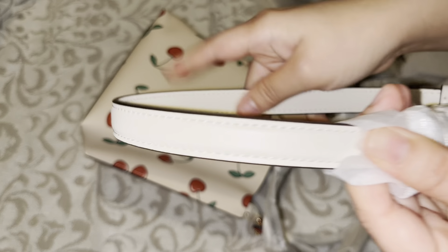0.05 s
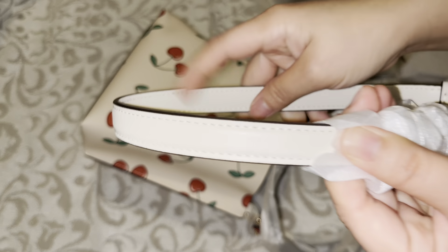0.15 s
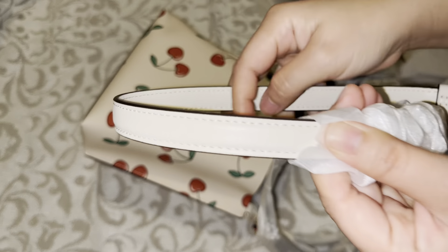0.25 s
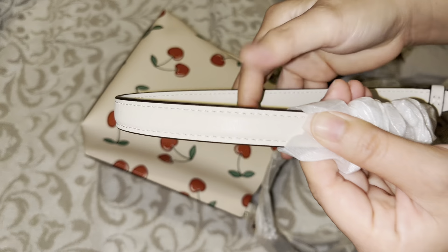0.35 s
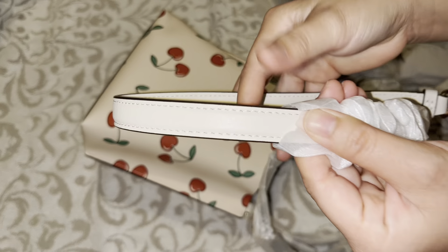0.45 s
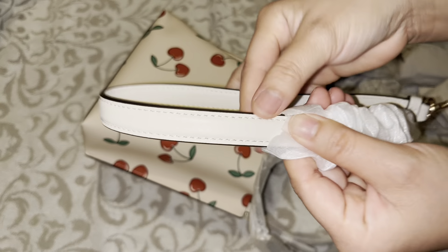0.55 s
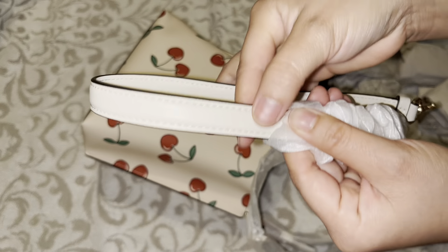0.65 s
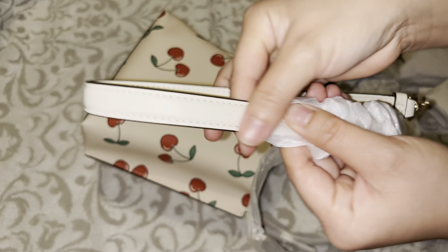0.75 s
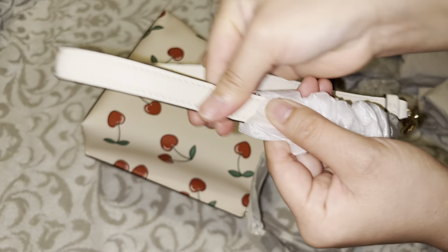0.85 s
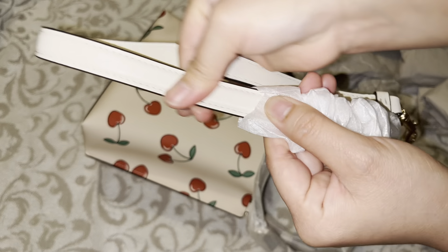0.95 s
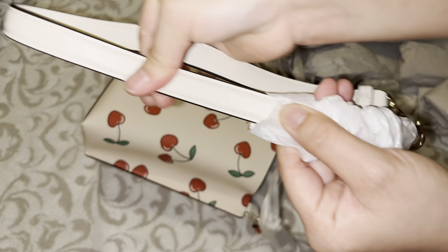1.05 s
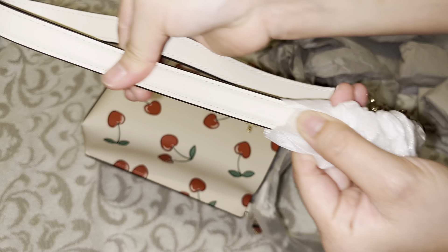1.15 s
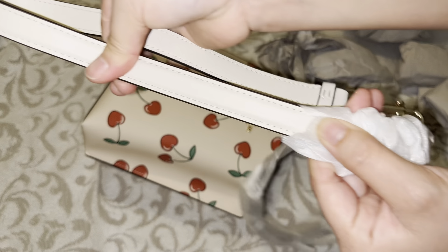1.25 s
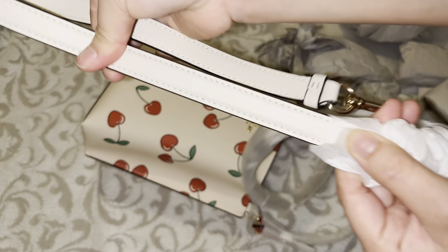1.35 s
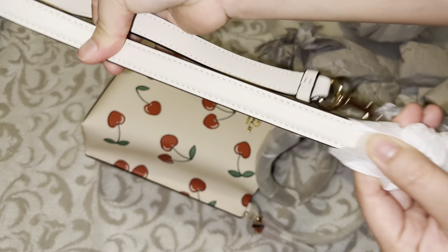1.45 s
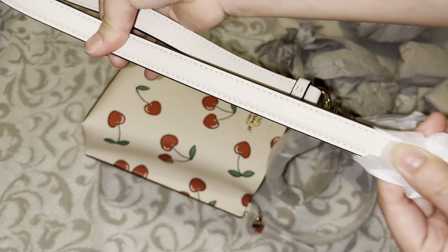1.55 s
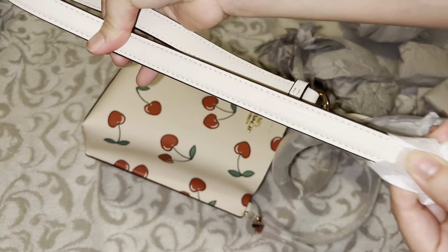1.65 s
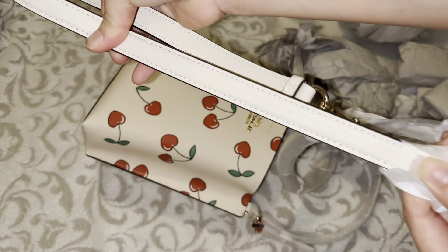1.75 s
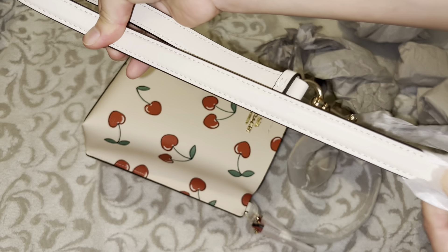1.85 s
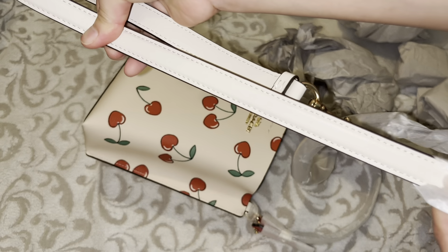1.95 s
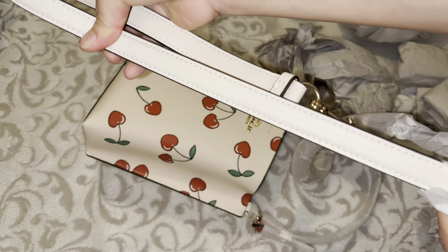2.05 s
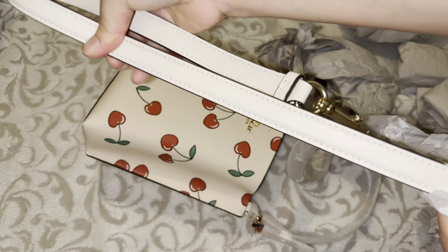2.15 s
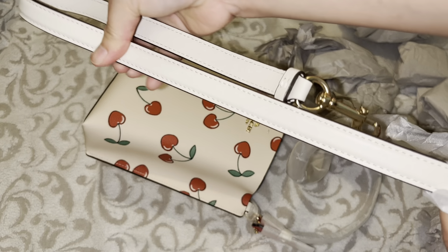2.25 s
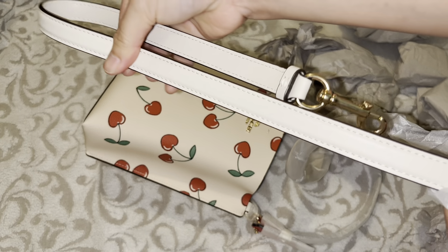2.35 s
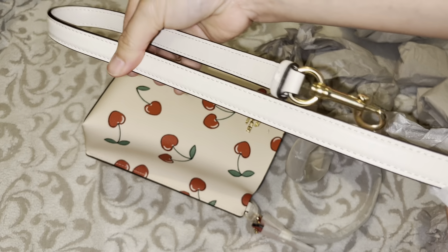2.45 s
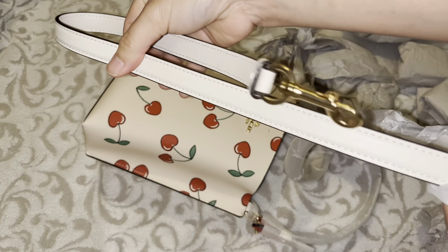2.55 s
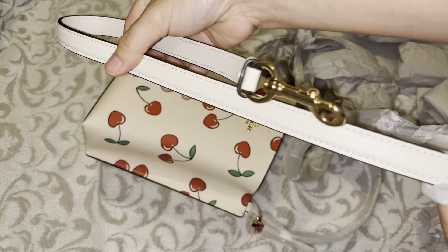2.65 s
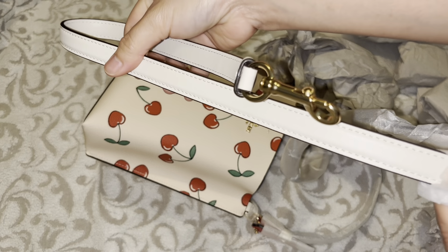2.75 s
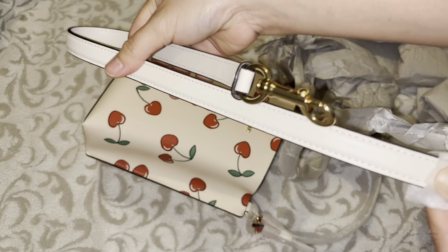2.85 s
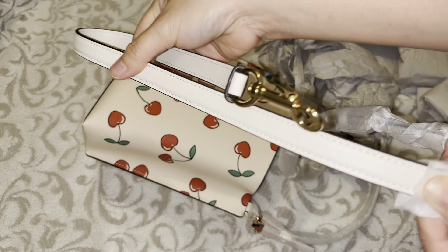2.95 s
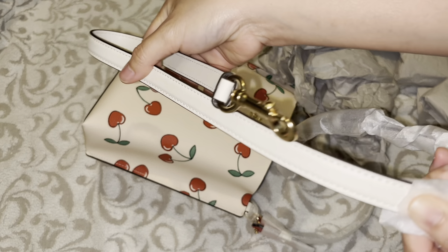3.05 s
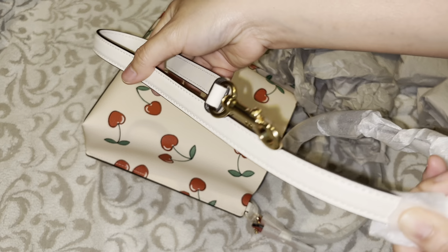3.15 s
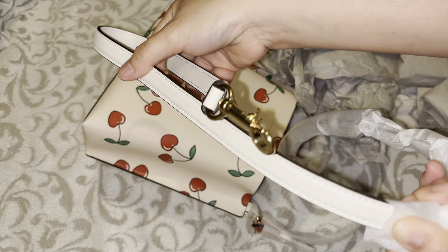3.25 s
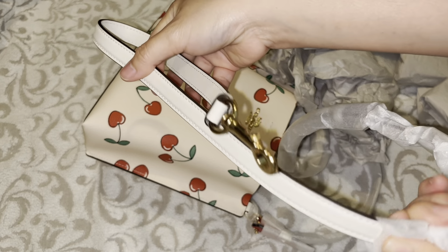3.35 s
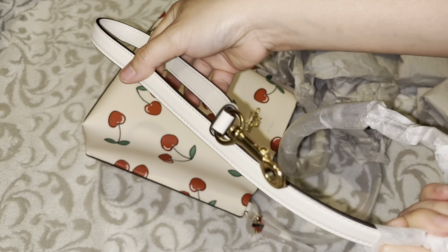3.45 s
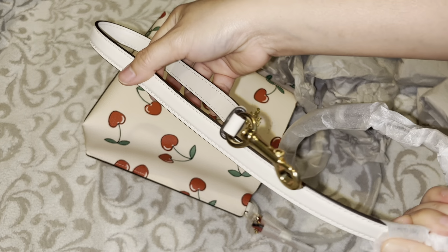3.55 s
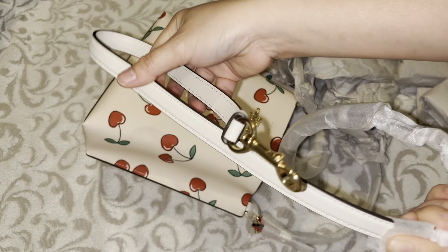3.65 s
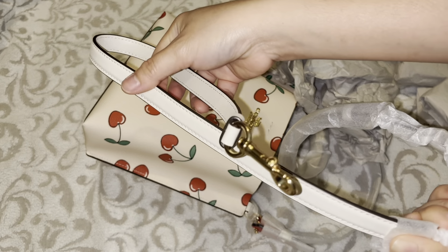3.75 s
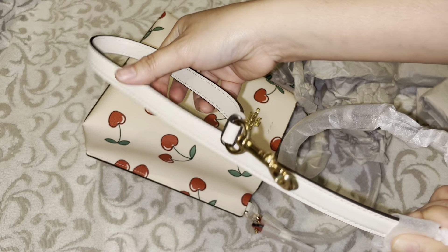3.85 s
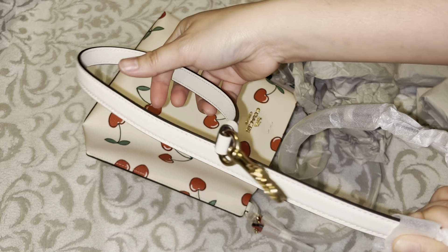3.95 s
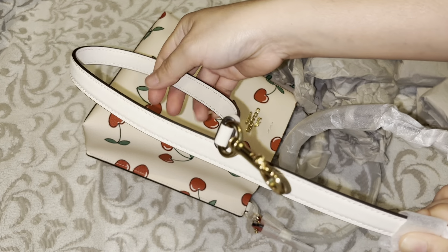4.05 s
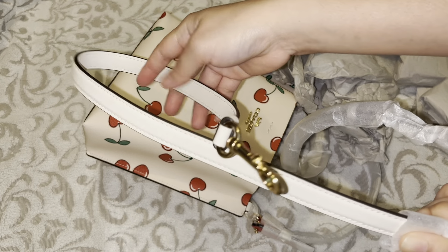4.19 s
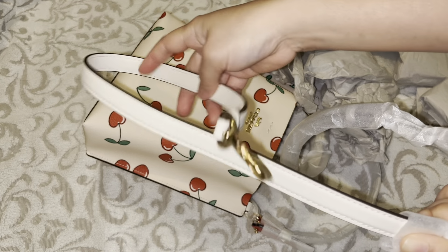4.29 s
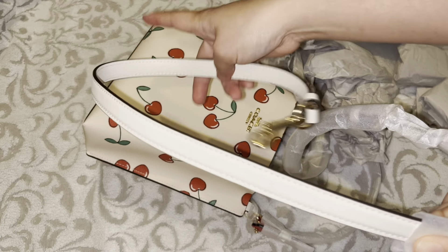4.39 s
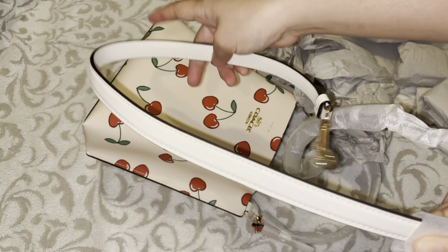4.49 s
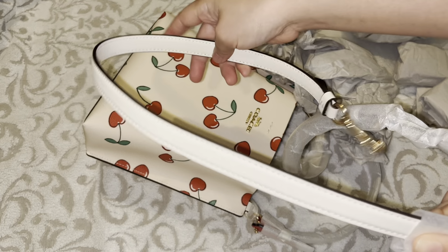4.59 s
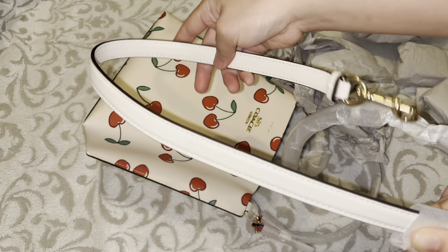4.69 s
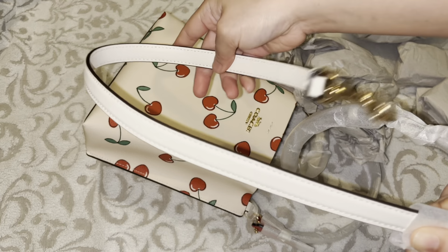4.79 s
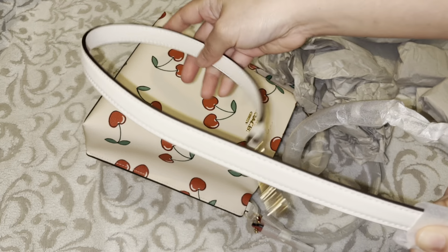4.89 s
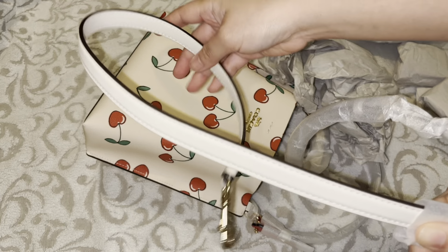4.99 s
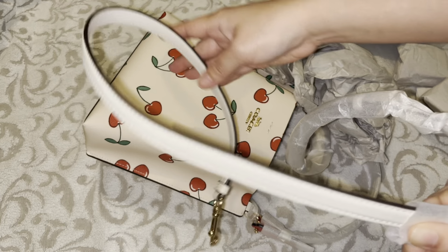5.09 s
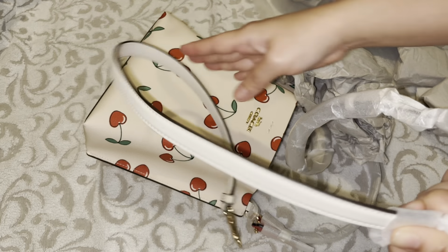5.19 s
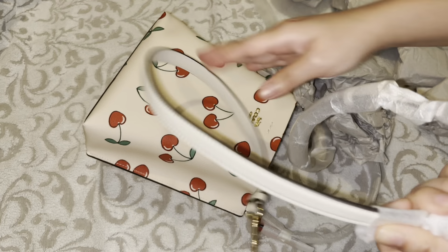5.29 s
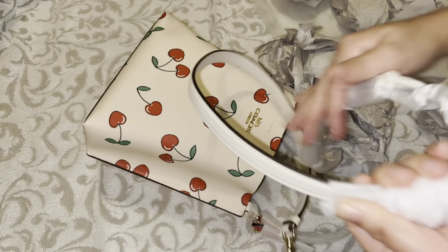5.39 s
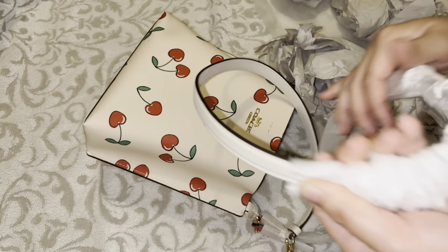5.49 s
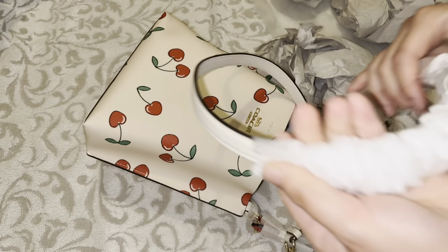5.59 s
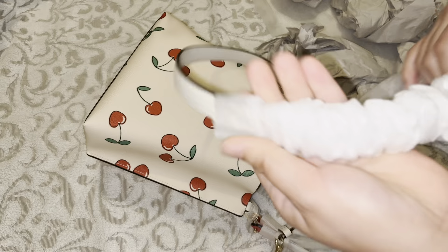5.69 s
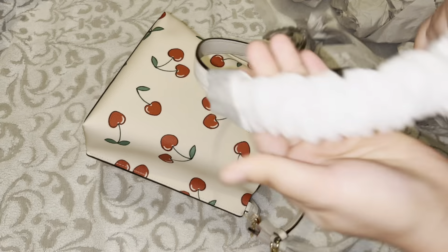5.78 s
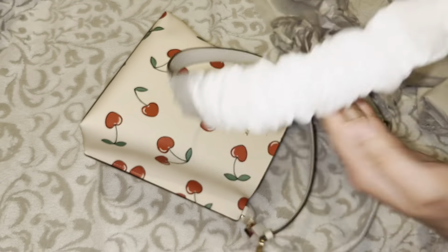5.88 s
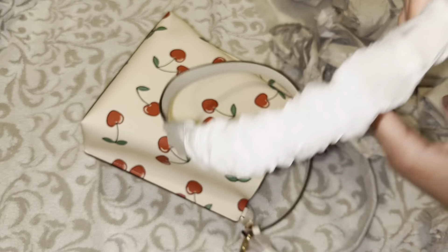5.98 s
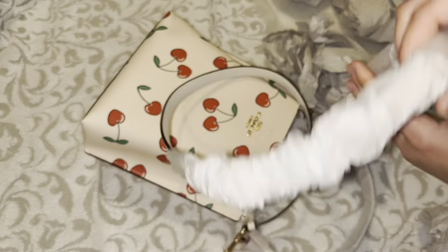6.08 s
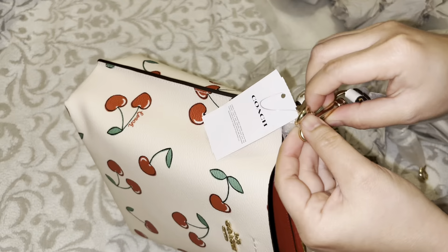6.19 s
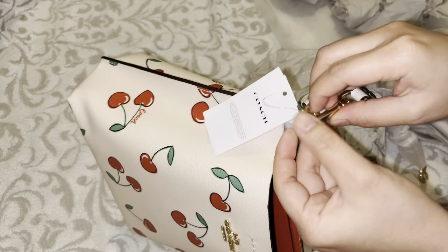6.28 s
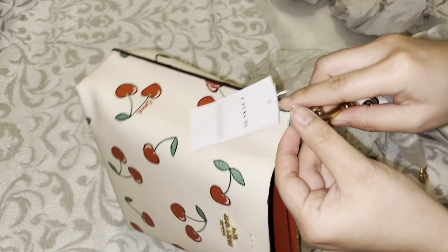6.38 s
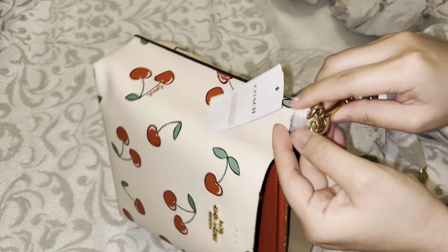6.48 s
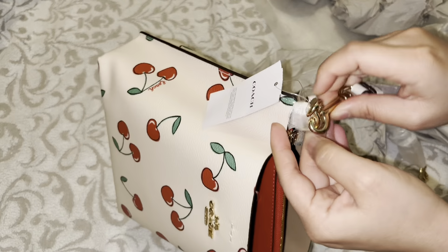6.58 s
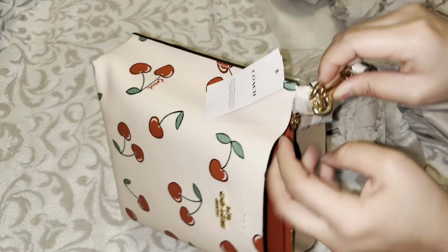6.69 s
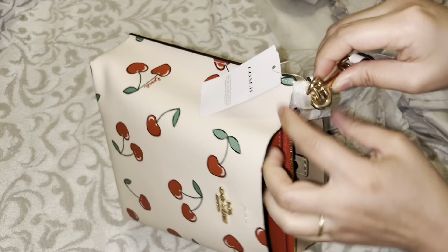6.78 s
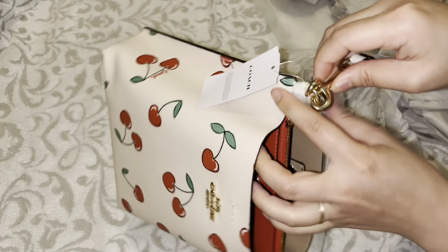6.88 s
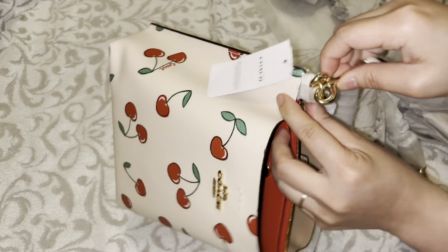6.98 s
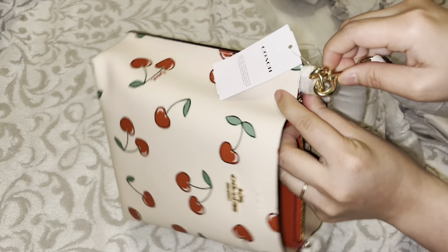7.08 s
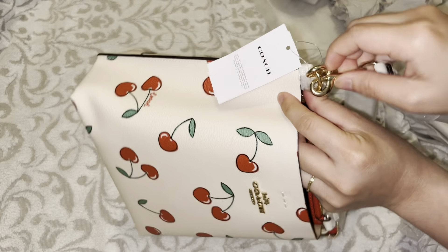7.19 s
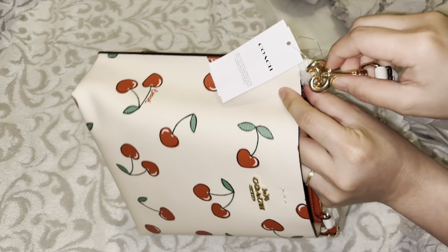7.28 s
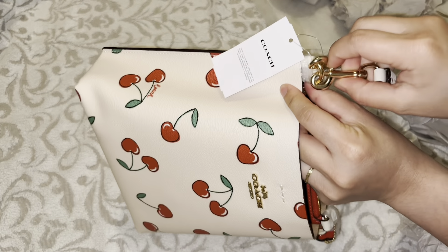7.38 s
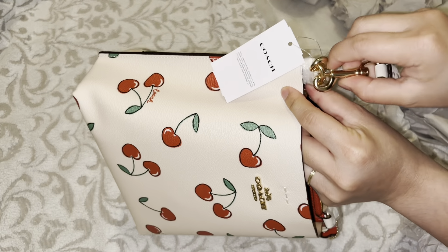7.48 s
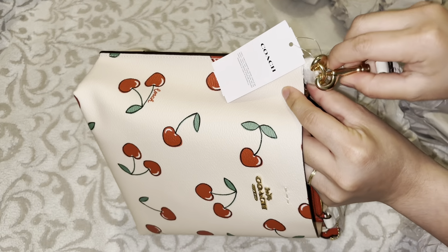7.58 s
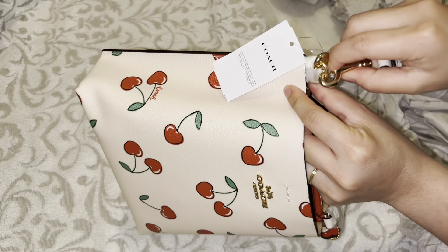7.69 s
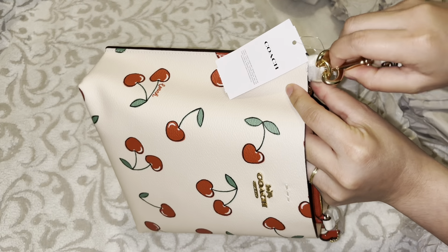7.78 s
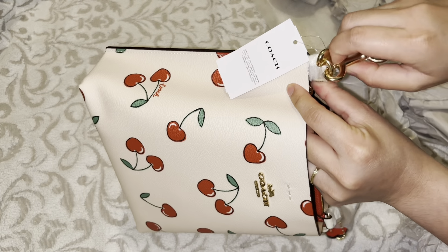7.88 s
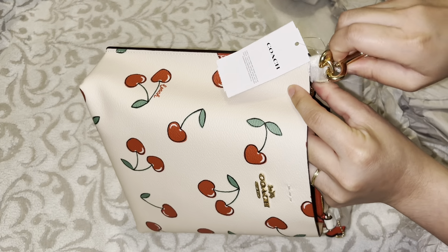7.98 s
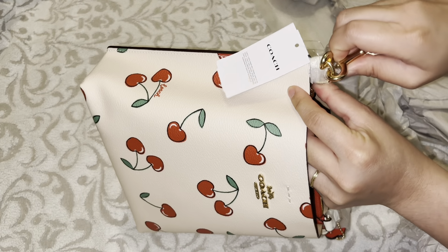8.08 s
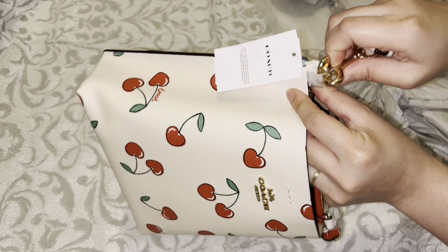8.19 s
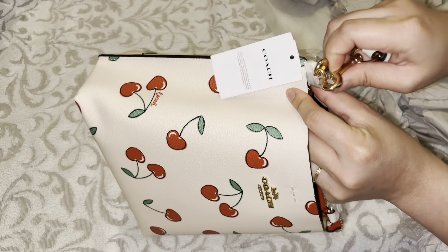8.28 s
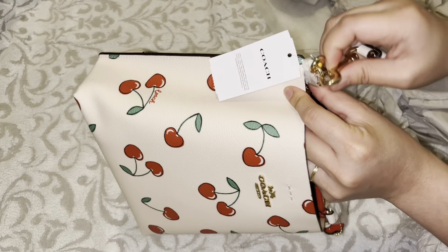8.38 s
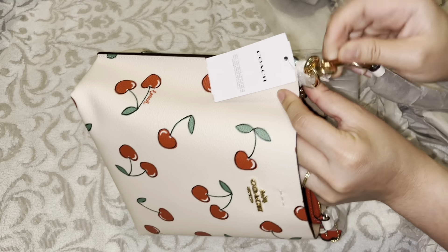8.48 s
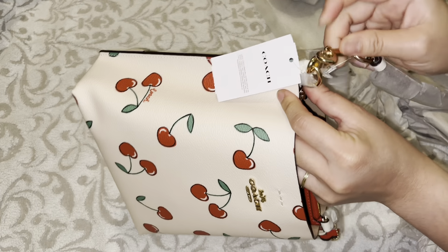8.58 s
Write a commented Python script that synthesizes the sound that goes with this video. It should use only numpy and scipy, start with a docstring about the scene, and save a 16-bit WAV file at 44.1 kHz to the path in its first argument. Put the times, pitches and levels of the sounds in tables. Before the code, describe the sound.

Close handling in a quiet room: papery sliding hiss, near silence with tiny ticks, then a sudden thud, metallic clicks, rustling and soft bag knocks.

```python
"""Close up in a quiet bedroom, a leather strap creaks in tiny stick-slip ticks while a faint tone swells and fades.
A tissue-paper sleeve is pulled along the strap: grainy noise hisses and a band of noise rings higher with effort.
The strap's metal clasp ticks, as short noise bursts through resonances, and then drops on a small handbag.
The paper crinkles in many small buckles as it is put aside; hands knock and rub the hollow bag, with thuds that
fall in pitch and murmuring, booming noise. The low rumble of the house, made of filtered noise, lies under it all."""
import sys
import numpy as np
from scipy import signal
from scipy.fft import rfft, irfft
from scipy.io import wavfile

SR = 44100
rng = np.random.default_rng(int(sys.argv[2]) if len(sys.argv) > 2 else 0)


def transcribe(u):
    """Save the signal u as a 16-bit wav file named by the first command-line argument.

    u: samples, shape (n,) or (channels, n), limited to [-1, 1]; the rate is SR.
    q: integer samples, one column per channel.
    """
    v = np.clip(np.atleast_2d(u).T, -1, 1)
    q = np.round(v * 32767).astype(np.int16)
    wavfile.write(sys.argv[1], SR, q)


N = 381024
TIME = np.arange(N) / SR
CUTOFF_HZ = 15900   # top of the sound
LEFT_RIGHT = np.array([[1], [-1]])   # opposite signs for the two channels


# soft blows on the bag's panels: (time [s], level [dB], base pitch [Hz])
PANEL_BLOWS = [(0.783, -59.5, 286), (1.116, -55.5, 260), (1.167, -51, 272), (1.378, -55, 420),
               (1.398, -49.5, 240), (1.555, -54.5, 169.3), (3.925, -55, 940), (5.187, -16, 260),
               (5.323, -35.5, 286), (5.716, -41, 243), (6.073, -28, 222), (6.072, -33.5, 404),
               (6.302, -36.5, 182), (6.341, -26.5, 234), (6.351, -33.5, 72), (6.476, -33.5, 185),
               (6.637, -40, 680), (6.635, -30, 250), (6.736, -35.5, 197), (6.99, -36.5, 1000),
               (7.002, -34, 300), (7.656, -35, 199), (8.435, -38, 230)]
# resonances of the hollow bag: (pitch [Hz], width [Hz], level [dB])
BAG_RESONANCES = [(410, 26, -3.5), (1000, 190, 3)]
SWELL_CYCLES = 1.37   # a thud's swell peaks after this many cycles of its base pitch
GLIDE_CYCLES = 0.83   # the extra pitch shrinks to about a third in this many cycles


def knocks(glide=2.175, scuff_db=-25.0):
    """Bending waves cross the panel, the short ones first, so each thud falls in pitch; the hollow bag rings on."""
    waves, push = np.zeros(N), np.zeros(N)
    t = np.arange(SR // 4) / SR
    for start_s, level_db, base_hz in PANEL_BLOWS:
        swell_s = SWELL_CYCLES / base_hz
        # the pitch starts far above its base and settles at 0.7 of it
        pitch_hz = base_hz * (0.7 + glide * np.exp(-t * base_hz / GLIDE_CYCLES))
        phase = 2 * np.pi * np.cumsum(pitch_hz) / SR
        swell = from_db(level_db) * (t / swell_s * np.exp(1 - t / swell_s)) ** 2
        add(waves, start_s, swell * np.sin(phase))
        add(push, start_s, swell)
    # the surfaces scuff while they are pressed together
    scuff = push * rms_one(resonance(rng.standard_normal(N), 310, 400))
    blows = waves + from_db(scuff_db) * scuff
    ringing = sum(from_db(db) * resonance(blows, hz, width) for hz, width, db in BAG_RESONANCES)
    return blows + ringing


# the clearest clicks of clasp, rings and paper creases; ring_db and crack_db below shift the two levels:
# (time [s], ring level [dB], ring pitch [Hz], crack level [dB])
HARD_CONTACTS = [(2.1105, -54.5, 2500, -54), (2.513, -49.5, 1780, -63), (3.5638, -66.5, 2870, -56),
                 (3.9268, -47.5, 2074, -56.5), (4.342, -58, 2370, -65.5), (4.3926, -60, 3700, -63),
                 (4.6325, -60, 3220, -60), (4.6727, -60.5, 3450, -53.5), (5.1863, -30, 1640, -38.5),
                 (5.323, -41.5, 1310, -76), (5.4525, -31, 2330, -38.5), (5.5096, -38, 1930, -47),
                 (5.5657, -39, 2420, -36.5), (5.6414, -45, 3050, -40), (5.7179, -41.5, 1380, -41.5),
                 (5.8026, -34, 2170, -59), (6.0721, -40, 1450, -72), (6.3427, -54, 1880, -40),
                 (6.3585, -34.5, 3250, -39), (6.429, -42.5, 3970, -54), (6.472, -44, 1330, -59),
                 (6.9875, -48.5, 1160, -44.5), (7.068, -43, 3430, -47), (7.6546, -58.5, 3830, -55)]


def clicks(ring_db=0.0, crack_db=5.0, thud_db=-8.5, ring_width_hz=1600, contact_s=0.0005,
           linger_db=-24.5, linger_t60=0.34, strike_db=19.0):
    """A hard contact gives a bright crack, a dull thud and a ring that lingers faintly as the parts settle."""
    out = np.zeros(N)
    t = np.arange(SR // 5) / SR
    contact = t / contact_s * np.exp(1 - t / contact_s) + from_db(-23 - 60 * t / .04)
    linger = from_db(linger_db - 60 * t / linger_t60)
    treble = signal.butter(2, 6000, "high", fs=SR, output="sos")
    bass = signal.butter(1, [250, 1300], "band", fs=SR, output="sos")
    for start_s, body_db, hz, treble_db in HARD_CONTACTS:
        noise = rng.standard_normal((3, len(t)))
        strike = from_db(strike_db) * (t == 0)   # a single-sample blow
        drive = strike + noise[0] * (contact + linger)
        ring = resonance(resonance(drive, hz, ring_width_hz), hz, ring_width_hz)
        crack = signal.sosfilt(treble, noise[1] * contact)
        thud = signal.sosfilt(bass, noise[2] * contact)
        parts = np.array([ring, crack, thud])
        levels_db = [ring_db + body_db, crack_db + treble_db, thud_db + body_db]
        gains = from_db(levels_db) / np.linalg.norm(parts, axis=1)
        # levels count as if all the energy fell within 2 ms
        add(out, start_s, np.sqrt(.002 * SR) * gains @ parts)
    return out


# the held bag is squeezed and flexes: (start [s], length [s], level [dB])
BAG_SQUEEZES = [(6.29, 0.53, -54), (6.95, 0.03, -51), (7.64, 0.38, -61), (8.22, 0.46, -57.5)]
SQUEEZE_ATTACK_S, SQUEEZE_SAG_DB_PER_S, SQUEEZE_RELEASE_DB_PER_S = 0.0014, 1, 34
RUB_SAG_DB_PER_S, RUB_RELEASE_DB_PER_S = 25, 1100
# spectrum of the bag's murmur: (frequency [Hz], relative level [dB per Hz])
MURMUR_SPECTRUM = [(40, -3), (130, -3.5), (210, 0), (320, 3.5), (430, -7), (600, -17), (4000, -36)]


def rubbing(flex_hz=78, flex_width_hz=55):
    """Dragging on the leather makes the hollow bag murmur and judder; its panels boom softly as they flex."""
    drag = moving([rub_db for *_, rub_db in HAND_MOVES], RUB_SAG_DB_PER_S, RUB_RELEASE_DB_PER_S)
    squeeze = strokes(BAG_SQUEEZES, SQUEEZE_ATTACK_S, SQUEEZE_SAG_DB_PER_S, SQUEEZE_RELEASE_DB_PER_S)
    judder_db = 3 * drift(70)
    murmur = drag * from_db(judder_db) * coloured(wide_noise(side_db=-16.5), MURMUR_SPECTRUM)
    flexing = resonance(wide_noise(side_db=-8.0), flex_hz, flex_width_hz)
    boom = rms_one(resonance(flexing, flex_hz, flex_width_hz))
    return murmur + squeeze * boom


# movements of the hands, each rustling the paper and rubbing the bag:
# (start [s], length [s], rustle level [dB], rub level [dB])
HAND_MOVES = [(-0.02, 0.054, -51.5, -68.5), (3.353, 0.058, -69, -100), (5.178, 0.096, -81, -42.5),
              (5.33, 0.12, -59, -41.5), (5.454, 0.12, -51.5, -50), (5.579, 0.19, -52.5, -69),
              (5.7, 0.15, -45.5, -55), (5.834, 0.2, -54, -76), (6.059, 0.07, -56, -45.5),
              (6.174, 0.11, -61, -58.5), (6.296, 0.075, -50, -48.5), (6.349, 0.38, -62.5, -59.5),
              (6.727, 0.075, -68, -57), (6.857, 0.25, -65.5, -58), (6.957, 0.18, -56, -53.5),
              (7.103, 0.52, -65, -61), (7.642, 0.052, -67, -53), (7.68, 0.78, -64.5, -68),
              (8.167, 0.26, -59.5, -58.5), (8.421, 0.2, -55.5, -52.5)]
MOVE_ATTACK_S, ORDINARY_MOVE_DB = 0.0073, -50.5   # a movement at this level has this attack time


def moving(level_db, sag_db_per_s, release_db_per_s):
    """Gain over time of the hand movements; the gentler a movement, the slower it sets in."""
    start, length, rustle_db, rub_db = np.transpose(HAND_MOVES)
    louder_db = np.maximum(rustle_db, rub_db)
    attack_s = MOVE_ATTACK_S * from_db(ORDINARY_MOVE_DB - louder_db)
    return strokes(np.transpose([start, length, level_db]), attack_s, sag_db_per_s, release_db_per_s)


# pulls of the paper sleeve along the strap: (start [s], length [s], level [dB])
SLEEVE_PULLS = [(-0.14, 0.11, -41.5), (0.535, 0.12, -48.5), (0.76, 0.065, -50), (0.87, 1.098, -34.5),
                (1.03, 0.18, -39)]
PULL_ATTACK_S, PULL_SAG_DB_PER_S, PULL_RELEASE_DB_PER_S = 0.08, 13.5, 159
# ring pitch at rest and at full effort; effort is this power of the pull's loudness
RING_REST_HZ, RING_FULL_HZ, RING_POWER = 2735, 4440, 2.2
# share of treble added at full effort, and where the treble begins
BRIGHTEN_SHARE, BRIGHTEN_HZ = 0.58, 8970
# spectrum of the sliding hiss: (frequency [Hz], relative level [dB per Hz])
HISS_SPECTRUM = [(150, -12.5), (450, -19), (900, -7.5), (2000, 0), (4500, 0), (8500, 0.5), (12000, 0.5),
                 (16000, -11.5)]


def sleeve(ring_db=-9.5, ring_width_hz=900, flutter_db=0.5):
    """Countless fibres catch on the leather and merge into a grainy hiss; the paper tube rings along."""
    pull = strokes(SLEEVE_PULLS, PULL_ATTACK_S, PULL_SAG_DB_PER_S, PULL_RELEASE_DB_PER_S)
    effort = (pull / pull.max()) ** RING_POWER
    catches = grains(per_s=6000, spread_db=3.5, low_hz=1100, sharpness=2)
    friction = wide_noise(side_db=-18.0) + catches / 2
    # slow noise times a gliding tone makes a noise band that follows the ring pitch
    ring_hz = RING_REST_HZ + (RING_FULL_HZ - RING_REST_HZ) * effort
    lowpass = signal.butter(2, ring_width_hz / 2, fs=SR, output="sos")
    slow_noise = signal.sosfilt(lowpass, rng.standard_normal((2, N)))
    tone = np.cos(2 * np.pi * np.cumsum(ring_hz) / SR)
    ring = rms_one(slow_noise * tone) * from_db(2 * LEFT_RIGHT)   # louder on the left
    hiss = coloured(friction, HISS_SPECTRUM) + from_db(ring_db) * ring
    treble = signal.sosfilt(signal.butter(1, BRIGHTEN_HZ, "high", fs=SR, output="sos"), hiss)
    flutter = from_db(flutter_db * drift(59.54))
    return pull * flutter * (hiss + BRIGHTEN_SHARE * effort * treble)


# single paper creases that snap: (time [s], level before ticks() halves it [dB])
PAPER_SNAPS = [(0.62, -54), (7.3385, -63.5), (8.273, -57.5), (8.3008, -57.5), (8.337, -61), (8.531, -54)]
RUSTLE_SAG_DB_PER_S, RUSTLE_RELEASE_DB_PER_S = 21, 315
# spectrum of the rustling paper: (frequency [Hz], relative level [dB per Hz])
RUSTLE_SPECTRUM = [(200, -25), (550, 1), (1000, 2.5), (1400, -3), (2600, 0), (5000, -3.5), (12000, -2.5),
                   (16000, -13)]


def paper(crackle_db=-4.0, snap_db=-6.5, crease_hz=3200, crease_width_hz=4000):
    """Sheets brush in fits and starts while small creases buckle in clumps and larger ones snap singly."""
    stir = moving([rustle_db for *_, rustle_db, _ in HAND_MOVES], RUSTLE_SAG_DB_PER_S, RUSTLE_RELEASE_DB_PER_S)
    crackle = grains(per_s=700, spread_db=5.5, low_hz=1100, sharpness=6)
    snaps = grains(per_s=70, spread_db=4, low_hz=1100, sharpness=2)
    brushing = wide_noise(side_db=-10.0) + from_db(crackle_db) * crackle
    sheet = patchy(brushing, depth_db=3.6, rate=40)
    flutter_db = 2 * drift(22) + drift(170)
    rustle = stir * from_db(flutter_db) * coloured(sheet + from_db(snap_db) * snaps, RUSTLE_SPECTRUM)
    return rustle + ticks(PAPER_SNAPS, crease_hz, crease_width_hz)


# creases and folds that give way in a quick run of small buckles:
# (time [s], length [s], relative level [dB], pitch [Hz])
FOLD_RUNS = [(5.338, 0.041, -54.5, 1860), (6.34, 0.014, -37.5, 1000), (7.054, 0.031, -55.5, 1040),
             (7.832, 0.12, -76.5, 2660), (8.432, 0.0079, -50, 2960), (8.49, 0.011, -53, 1400),
             (8.566, 0.011, -55, 2830)]


def scrunches(bright_db=-11.0, width_hz=1500, buckles_per_s=2500):
    """A run of uneven buckles rings the fold it runs along, with a dry, bright edge."""
    out = np.zeros(N)
    t = np.arange(SR // 8) / SR
    bright_band = signal.butter(1, [900, 12000], "band", fs=SR, output="sos")
    for start_s, length_s, level_db, hz in FOLD_RUNS:
        size, chance = rng.standard_normal(len(t)), rng.random(len(t))
        buckles = size * (.2 + (chance < buckles_per_s / SR))
        run = buckles * np.exp(-(t / length_s) ** 2)
        fold = rms_one(resonance(run, hz, width_hz))
        edge = rms_one(signal.sosfilt(bright_band, run))
        sound = fold + from_db(bright_db) * edge
        # short runs carry less energy
        add(out, start_s, from_db(level_db) * np.sqrt(length_s / t[-1]) * sound)
    return out


# the sharpest slips of the leather: (time [s], level before ticks() halves it [dB])
SHARP_SLIPS = [(0.0893, -51), (0.2862, -64), (0.7128, -54.5), (2.345, -59), (2.501, -63), (2.5448, -65.5),
               (3.274, -60), (3.2881, -61), (3.5947, -57), (3.7736, -65), (7.118, -52), (7.59, -63.5),
               (8.248, -63)]
# the strap is bent between the fingers and creaks: (start [s], length [s], level [dB])
STRAP_BENDS = [(0.1, 0.9, -68), (2.03, 0.45, -70.5), (2.68, 0.32, -68), (3.25, 0.32, -64.5)]
BEND_ATTACK_S, BEND_SAG_DB_PER_S, BEND_RELEASE_DB_PER_S = 0.022, 9.5, 105
# spectrum of the creaking leather: (frequency [Hz], relative level [dB per Hz])
CREAK_SPECTRUM = [(500, -8), (6000, -21), (9000, -11.5), (12000, -11), (16000, -7)]


def strap(skin_db=-12.5, slip_hz=11000, slip_width_hz=4000):
    """Leather sticks and slips under the fingers in small, bright ticks, with a few sharper ones."""
    bend = strokes(STRAP_BENDS, BEND_ATTACK_S, BEND_SAG_DB_PER_S, BEND_RELEASE_DB_PER_S)
    slips = grains(per_s=260, spread_db=4.5, low_hz=4500, sharpness=2)
    skin = from_db(skin_db) * wide_noise(side_db=-10.0)
    creak = bend * coloured(slips + skin, CREAK_SPECTRUM)
    return creak + ticks(SHARP_SLIPS, slip_hz, slip_width_hz)


WHISTLE_START_S, WHISTLE_LENGTH_S, WHISTLE_DB, WHISTLE_HZ = 0.03, 0.77, -84.5, 1430


def whistle(waver=0.0079):
    """A thin, faint tone in the background swells quickly, wavers and fades slowly."""
    age = 3 * np.maximum(TIME - WHISTLE_START_S, 0) / WHISTLE_LENGTH_S   # swell peaks at age 1
    swell = (age * np.exp(1 - age)) ** 2 * from_db(drift(30))
    pitch_hz = WHISTLE_HZ * (1 + waver * drift(48))
    tone = np.sqrt(2) * np.sin(2 * np.pi * np.cumsum(pitch_hz) / SR)
    return from_db(WHISTLE_DB) * swell * tone


# spectrum of the house's rumble: (frequency [Hz], relative level [dB per Hz])
RUMBLE_SPECTRUM = [(30, -19), (50, -1), (64, 1), (85, -3.5), (125, -15), (200, -24), (1000, -41),
                   (3000, -47.5), (16000, -49.5)]


def house_rumble(level_db=-62.5):
    """The low rumble of the house: steady wide noise, strongest in the bass."""
    return from_db(level_db) * coloured(wide_noise(side_db=-8.0), RUMBLE_SPECTRUM)


def bedroom(x, wet_db=-14.0, t60=0.094, low_hz=500, high_hz=7000):
    """Faint, short reverberation among soft furnishings: the sound smeared by a dying noise tail."""
    t = np.arange(SR // 3) / SR
    tail = rng.standard_normal((2, len(t))) * from_db(-60 * t / t60) * (t > .003)
    tail = signal.sosfilt(signal.butter(1, [low_hz, high_hz], "band", fs=SR, output="sos"), tail)
    tail = tail / np.linalg.norm(tail, axis=1, keepdims=True)
    return from_db(wet_db) * signal.fftconvolve(x, tail, axes=1)[:, :N]


# phase by which the left microphone port leads the right: (frequency [Hz], phase [radians])
PORT_LEAD = [(0, 0), (1200, -0.2), (1550, -1.0), (1900, 0), (4700, 0.5), (5500, -1.2), (6700, -1.5),
             (8300, -3.14), (12000, -6.28), (15500, -9.4)]


def ports(x):
    """The two microphone ports hear sounds with a phase gap that grows in the treble."""
    phase = np.interp(np.arange(N // 2 + 1) * SR / N, *np.transpose(PORT_LEAD))
    return irfft(rfft(x) * np.exp(.5j * phase * LEFT_RIGHT), N)


def grains(per_s, spread_db, low_hz, sharpness):
    """Tiny buckles of uneven size, each a tick with a brief ring at a pitch and place of its own."""
    sizes = from_db(spread_db * np.minimum(rng.exponential(1, N), 3)) * rng.choice([-1, 1], N)
    crowding = from_db(4 * drift(35))   # the buckles come in clumps
    buckles = sizes * (rng.random(N) < per_s * crowding / SR)
    pitches = np.geomspace(low_hz, CUTOFF_HZ, 14)
    dealt = rng.integers(0, len(pitches), N)
    out = 0
    for k, hz in enumerate(pitches):
        ring = resonance(buckles * (dealt == k), hz, hz / max(sharpness, 1))
        lean_db = 2 * (-1) ** k * LEFT_RIGHT   # pitches lean left and right in turn
        out = out + ring / hz ** .2 * from_db(lean_db)
    return rms_one(out)


def ticks(rows, hz, width_hz, decay_s=0.0032):
    """Single dry ticks from (time, level) rows: a brief jerk through a broad resonance."""
    out = np.zeros(N)
    t = np.arange(int(10 * decay_s * SR)) / SR
    for start_s, level_db in rows:
        jerk = rng.standard_normal(len(t)) * np.exp(-t / decay_s)
        add(out, start_s, from_db(level_db) / 2 * rms_one(resonance(jerk, hz, width_hz)))
    return out


def strokes(rows, attack_s, sag_db_per_s, release_db_per_s):
    """Gain from (start, length, level) rows: each stroke builds up, slackens while it lasts, then dies away."""
    start, length, db = np.transpose(rows)
    clock = np.arange(0, N / SR, .001)
    t = np.maximum(clock[:, None] - start, 0)
    fall_db = sag_db_per_s * t + release_db_per_s * np.maximum(t - length, 0)
    gains = (1 - np.exp(-t / attack_s)) ** 2 * from_db(db - fall_db)
    return np.interp(TIME, clock, np.linalg.norm(gains, axis=1))   # overlapping strokes add in power


def patchy(x, depth_db, rate):
    """Each fold of a sheet has a pitch of its own, so the bands swell and fade partly apart."""
    centres = np.log(np.geomspace(300, CUTOFF_HZ, 13))
    spectrum = rfft(x)
    bins = np.log(np.maximum(np.arange(N // 2 + 1) * SR / N, 1))
    out = 0
    for one in np.eye(len(centres)):   # a triangle around one centre at a time
        band = irfft(spectrum * np.interp(bins, centres, one), N)
        out = out + band * from_db(depth_db * drift(rate))
    return rms_one(out)


# spectrum of the side part of spread-out noise: (frequency [Hz], relative level [dB per Hz])
SIDE_SPECTRUM = [(60, -13), (300, 0), (500, 5.5), (1450, 13.5), (1900, 5), (16000, -26)]


def wide_noise(side_db):
    """Stereo noise from a spread-out source, widest in the middle register."""
    mid, side = rng.standard_normal((2, N))
    return rms_one(mid + from_db(side_db) * coloured(side, SIDE_SPECTRUM) * LEFT_RIGHT)


def coloured(x, spectrum):
    """Give x a smooth spectrum; unit power."""
    hz, db = np.transpose(spectrum)
    bins = np.maximum(np.arange(N // 2 + 1) * SR / N, 1)
    gain = from_db(np.interp(np.log(bins), np.log(hz), db))
    return rms_one(irfft(rfft(x) * gain, N))


def resonance(x, hz, width_hz):
    """Two-pole resonance with unit gain on top."""
    r = np.exp(-np.pi * width_hz / SR)
    feedback = [1, -2 * r * np.cos(2 * np.pi * hz / SR), r * r]
    return signal.lfilter(np.array([1, 0, -1]) * (1 - r * r) / 2, feedback, x + 1e-18)


def drift(rate):
    """Slow chance: random points of spread one, this many per second, joined by straight lines."""
    knots = rng.standard_normal(N // 20)
    return np.interp(TIME * rate, np.arange(len(knots)), knots)


def add(track, s, sound):
    """Mix a sound into a track from time s on."""
    start = int(s * SR)
    track[start:start + len(sound)] += sound[:N - start]


def from_db(db):
    """Decibels to gain."""
    return 10 ** (np.asarray(db) / 20)


def rms_one(x):
    """Scale to unit power."""
    return x / np.sqrt(np.mean(x ** 2) + 1e-20)


def scene():
    """Handling sounds near the microphone and their echo, over the faint tone and the rumble of the house."""
    bag = knocks() + clicks() + rubbing()
    near = bag + sleeve() + paper() + scrunches() + strap()
    background = whistle() + house_rumble()
    return ports(near + background) + bedroom(near)


def record(dry):
    """The top is cut steeply."""
    return signal.sosfilt(signal.ellip(10, .1, 80, CUTOFF_HZ, fs=SR, output="sos"), dry)


dry = scene()
out = record(dry)
transcribe(out)
```